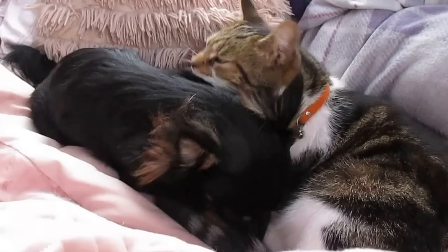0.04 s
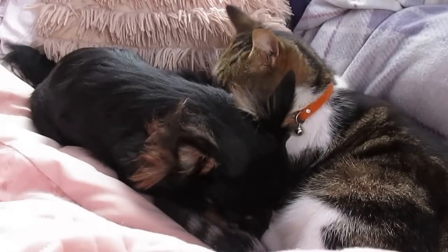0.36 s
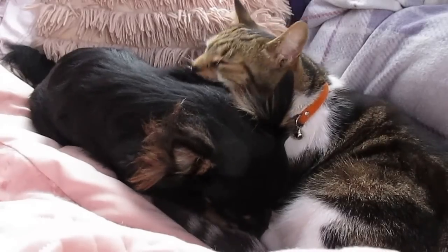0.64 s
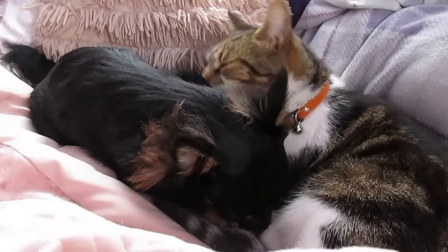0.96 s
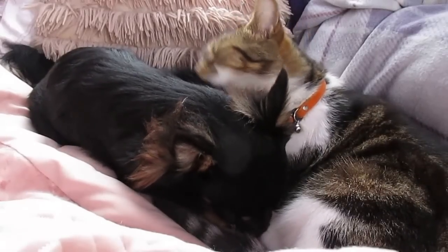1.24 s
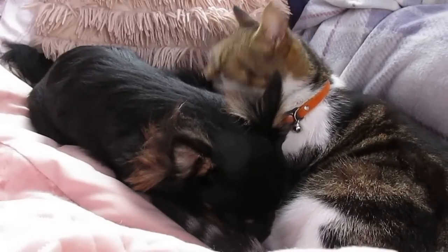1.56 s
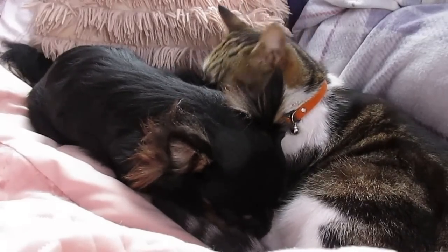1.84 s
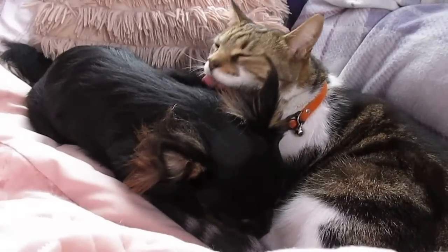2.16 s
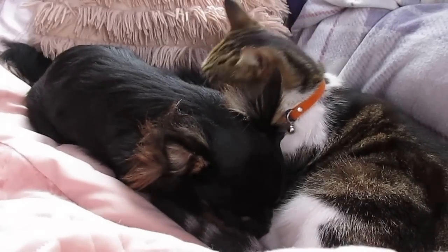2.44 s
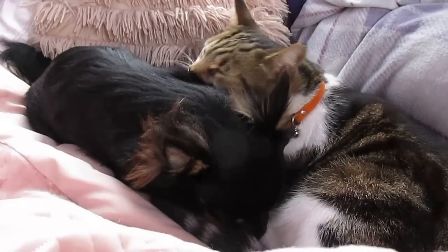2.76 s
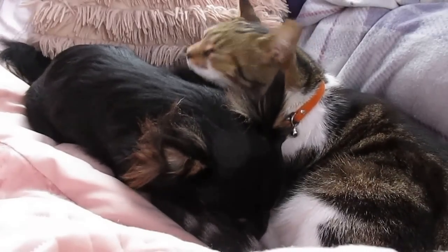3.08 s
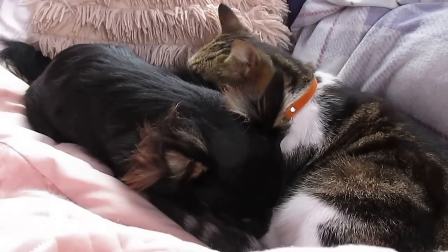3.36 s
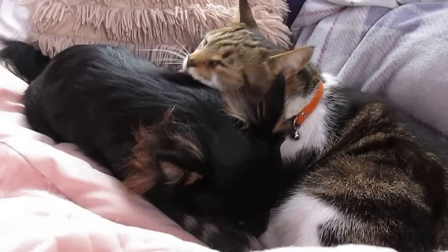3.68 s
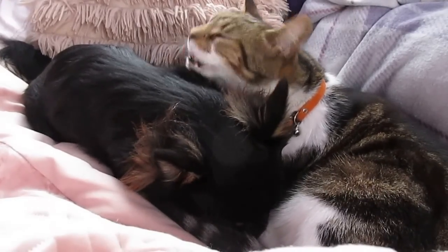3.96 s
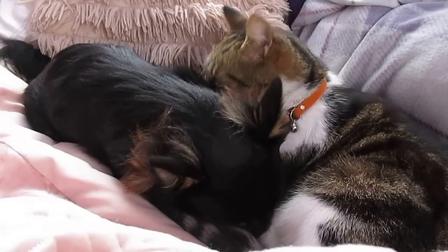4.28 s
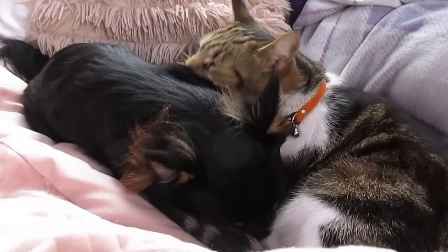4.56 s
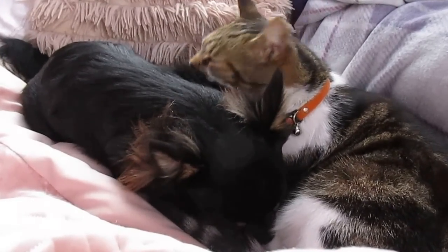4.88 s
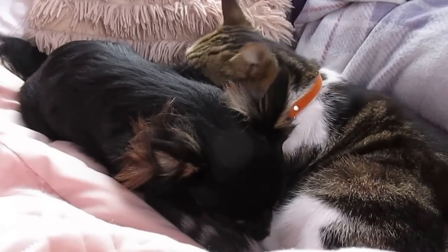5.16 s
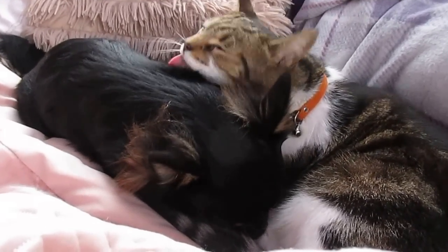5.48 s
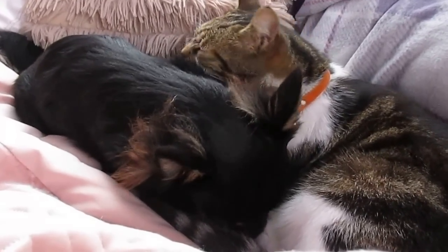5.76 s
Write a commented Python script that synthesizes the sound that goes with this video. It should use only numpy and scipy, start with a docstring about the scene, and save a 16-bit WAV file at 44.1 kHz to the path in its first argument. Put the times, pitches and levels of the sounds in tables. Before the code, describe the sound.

A cat licks a dog with faint wet clicks and rasps, over low room hum and a distant engine fading away.

```python
"""A cat grooms a dog on soft bedding in a quiet room, about a metre from a phone.
Over steady room tone and a wavering hum, a distant engine drones past behind the walls and fades.
The cat's tongue makes tiny wet clicks and rasps through the fur; a collar tinks faintly now and then.
Two muffled swells follow, then a soft, dull thump close to the microphone and one smack of the tongue.
Two more thumps come, the loudest on the left like handling of the phone, and a paw rubs the blanket."""
import sys
import numpy as np
from scipy import signal
from scipy.fft import rfft, irfft, next_fast_len
from scipy.io import wavfile

SR = 44100
rng = np.random.default_rng(int(sys.argv[2]) if len(sys.argv) > 2 else 0)


def wav_record(signal):
    """Record a signal, one row per channel, as 16-bit PCM in the file named by sys.argv[1]."""
    frames = np.transpose(np.atleast_2d(signal))
    bounded = np.clip(frames, -1, 1)
    # unit amplitude maps onto the largest positive 16-bit level
    quanta = np.round(bounded * 32767).astype(np.int16)
    wavfile.write(sys.argv[1], SR, quanta)


N = 265482
TIME = np.arange(N) / SR
TOP_HZ = 15800

# EQ of the room tone: (frequency [Hz], gain [dB])
ROOM_EQ = [(15, -10), (30, -9), (58, -2), (110, -9.5), (180, -10.5), (235, -19), (290, -19.5), (550, -29),
           (800, -26), (980, -28.5), (1150, -24.5), (1700, -34), (3000, -45.5), (6000, -57)]
# EQ of the microphone hiss: (frequency [Hz], gain [dB])
HISS_EQ = [(500, -6), (2400, 0.5), (3500, -1), (5000, -3.5), (7000, -3), (9200, -2), (12000, -5),
           (15500, -11)]
# weak tones of the engine and its driven parts: (multiple of the firing rate, level re firing tone [dB])
ENGINE_PARTIALS = [(.5, -17.5), (3, -17.5), (3.38, -22.5), (4.27, -26), (5, -32.5), (6, -29)]
# EQ of the engine's rumble: (frequency [Hz], gain [dB])
RUMBLE_EQ = [(15, -2), (32, 8), (60, 9.5), (90, -9), (125, 1), (162, 4), (200, -8), (243, -1), (275, -16),
             (390, -17), (520, -21), (740, -20.5), (950, -26), (1800, -41)]
# EQ of the engine's brighter noise as it approaches: (frequency [Hz], gain [dB])
APPROACH_EQ = [(180, -6), (240, 6), (330, 2), (480, -6), (720, -4), (1000, -14), (1900, -17), (3500, -32)]
# wet tongue clicks: (time [s], peak level [dB], pitch [Hz])
TONGUE_CLICKS = [(.2185, -48, 11200), (.2668, -50, 14000), (.792, -49, 2500), (.807, -42, 7640),
                 (.8072, -43, 14000), (1.1706, -42, 3600), (1.496, -45, 13000), (1.635, -44.5, 10900),
                 (1.786, -43, 3320), (2.1375, -50, 2900), (2.1676, -37.5, 9500), (2.1686, -36, 14200),
                 (2.9985, -47, 13000), (3.2405, -48.5, 7700), (3.709, -40, 10200), (3.7141, -48.5, 2840),
                 (3.805, -40.5, 9600), (3.905, -48.5, 2800), (4.6874, -40, 2500), (4.7444, -45, 8000),
                 (4.7446, -46, 14000), (4.979, -47, 10100)]
# tongue strokes through fur: (time [s], half length [s], level [dB], low-pass [Hz], mouth ring mix [dB])
LICK_STROKES = [(.767, 0.049, -69, 9000, -4), (1.723, .03, -66, 4500, -11), (1.845, .018, -63.5, 5000, 3),
                (2.714, 0.021, -58.5, 10000, -6.5), (2.927, .037, -69, 14000, -7),
                (3.767, .022, -62.5, 3600, -8), (4.718, .021, -56.5, 8900, -7),
                (4.99, 0.054, -68.5, 8000, -14), (5.713, 0.051, -66, 5000, -11)]
# EQ of the plucked hairs: (frequency [Hz], gain [dB])
RASP_EQ = [(600, 0), (1300, -6), (1850, 0.5), (2300, 1), (2750, -1), (3400, 4), (4500, 0.5), (5100, -0.5),
           (5900, 3.5), (7000, -1), (9600, 1.5), (12000, -3), (16000, -16)]
# resonances of the half-open mouth during a stroke: (frequency [Hz], width [Hz], gain [dB])
LICK_FORMANTS = [(2264, 82, 7), (3170, 97, -12), (4350, 170, -2.5)]
# whiskers and cheek brushing the coat: (time [s], half length [s], level [dB])
CHEEK_BRUSHES = [(.76, .062, -71), (2.97, .088, -72), (3.743, 0.18, -68.5), (5.448, .11, -68)]
# light touches of the collar's metal fittings: (time [s], peak level [dB], pitch [Hz])
COLLAR_TINKS = [(1.787, -59, 3300), (3.003, -57.5, 4980), (5.3775, -57, 4950)]
# muffled swells in the low mids: (time [s], half length [s], level [dB])
MUFFLED_SWELLS = [(2.273, 0.11, -66), (2.865, 0.048, -67)]
# soft, dull thumps close to the microphone: (time [s], level [dB], pitch [Hz], left minus right [dB])
CLOSE_THUMPS = [(4.6868, -53, 290, 4), (5.641, -50, 510, -1), (5.7222, -43, 246, 19)]
# EQ of the crunch in each thump: (frequency [Hz], gain [dB])
CRUNCH_EQ = [(150, -8), (330, 14), (650, -6), (1100, -9), (2400, -19), (4200, -14), (8000, -24),
             (15000, -31)]
# modes of the open mouth rung by a smack: (frequency [Hz], gain [dB], t60 [s])
SMACK_MODES = [(2000, 5, 0.0069), (2450, 4, 0.0078), (2800, -5.5, 0.014), (3380, -5, 0.0074),
               (3870, -3, 0.0079), (5650, -3.5, 0.005), (6100, -8, 0.0063), (7600, -3, .007),
               (8470, -3, 0.0055), (9800, -12, 0.0049), (12400, 9, 0.0028), (14800, 2, .0018)]
# EQ of a paw rubbing the blanket: (frequency [Hz], gain [dB])
RUB_EQ = [(150, 3.5), (380, -0.5), (470, 6), (560, -3.5), (900, -1.5), (1250, -21), (1500, -9), (1700, -17),
          (2100, -6.5), (2800, -14.5), (3200, -12), (4200, -27), (9000, -25), (15000, -39)]


def undb(db):
    """Decibels to gain."""
    return 10 ** (np.asarray(db) / 20)


def unit(x):
    """Scale to rms 1."""
    return x / np.sqrt(np.mean(x ** 2))


def pan(db):
    """Left and right gains for a level difference; positive leans left."""
    return undb(np.array([[db], [-db]]) / 2)


def butter(x, order, hz, kind="low"):
    """Run a sound through a Butterworth filter."""
    return signal.sosfilt(signal.butter(order, hz, kind, fs=SR, output="sos"), x)


def wander(rate_hz):
    """Smooth random modulation of rms 1, rolling off above the given rate."""
    hz = np.arange(N // 2 + 1) * SR / N
    return unit(irfft(rfft(rng.standard_normal(N)) * np.exp(-(hz / rate_hz) ** 2), N))


def noise(eq, correlation, below_hz=20000):
    """Stereo noise of rms 1 shaped by an EQ; left and right are partly correlated below a frequency."""
    size = next_fast_len(N, real=True)
    hz = np.maximum(np.arange(size // 2 + 1) * SR / size, 1)
    eq_hz, eq_db = np.array(eq).T
    low_cut = np.minimum(hz / eq_hz[0], 1)
    gain = undb(np.interp(np.log(hz), np.log(eq_hz), eq_db)) * low_cut
    likeness = correlation * np.exp(-(hz / below_hz) ** 4)
    mid, side = rfft(rng.standard_normal((2, size)))
    mid, side = mid * np.sqrt(1 + likeness), side * np.sqrt(1 - likeness)
    return unit(irfft(gain * np.array([mid + side, mid - side]), size)[:, :N])


def bell(s, half_s):
    """A bell-shaped envelope that peaks at time s and is at 61% half_s to either side."""
    return np.exp(-((TIME - s) / half_s) ** 2 / 2)


def push(s, attack_s):
    """An envelope that starts at time s, rises to 1 over the attack and dies away."""
    age = np.maximum(TIME - s, 0) / attack_s
    return age * np.exp(1 - age)


def ping(t, hz, t60):
    """One struck resonance: a sine that falls 60 dB in t60 seconds."""
    return np.sin(2 * np.pi * hz * t) * undb(-60 * t / t60)


def add(out, s, sound):
    """Mix a short stereo sound in at time s."""
    start = int(s * SR)
    out[:, start:start + sound.shape[1]] += sound[:, :N - start]


def scatter(ring, tail_db, t60):
    """A click scaled to peak 1, trailed on each side by weak reflections from things close by."""
    t = TIME[:len(ring)]
    paths = undb(tail_db) * rng.standard_normal((2, len(t))) * undb(-60 * t / t60)
    paths[:, 0] = 1  # direct sound
    return signal.fftconvolve(paths, ring[None] / np.abs(ring).max(), axes=1)


def room_tone(air_db=-50.5, hiss_db=-63.5):
    """A bed of low room noise, its mids leaning right, under smooth microphone hiss."""
    air = undb(air_db + 1.03 * wander(1.2)) * noise(ROOM_EQ, correlation=.31, below_hz=107)
    mids = butter(air, 1, [450, 2200], "band")
    hiss = undb(hiss_db) * pan(.4) * noise(HISS_EQ, correlation=.065)
    return air - mids + pan(-3.5) * mids + hiss


def pass_by(fall_s, nearest_s=.59):
    """One-over-distance gain of a source passing in a line: 1 when nearest, 3 dB down fall_s later."""
    return 1 / np.hypot(1, (TIME - nearest_s) / fall_s)


def engine(firing_hz=71.32, climb_hz_per_s=.3, tone_db=-40, rumble_db=-44, approach_db=-56):
    """A far engine goes by, brighter as it comes; walls pass mainly its low firing tones and rumble."""
    rate_hz = (firing_hz + climb_hz_per_s * TIME) * (1 + .002 * wander(7.07))
    phase = 2 * np.pi * np.cumsum(rate_hz) / SR
    dip_db = -17.5 * bell(.327, .11)  # the octave drops out once on the approach
    tones = undb(tone_db) * np.sin(phase) + undb(tone_db + dip_db) * np.sin(2 * phase)
    for order, db in ENGINE_PARTIALS:
        gain = undb(tone_db + db + 2.4 * wander(3.1))
        tones += gain * np.sin(order * phase + 2 * np.pi * rng.random())
    rumble = undb(rumble_db) * noise(RUMBLE_EQ, correlation=.78, below_hz=460)
    approach = undb(approach_db) * noise(APPROACH_EQ, correlation=.3) * bell(.18, .3)
    return np.sqrt(2) * tones * pass_by(fall_s=.49) + rumble * pass_by(fall_s=1.32) + approach


def hum(hz=149.64, pitch_waver=.01229, start_db=-55, growth_db_per_s=.8, waver_db=2.2):
    """An unsteady, slowly growing hum that beats against the engine's octave."""
    phase = 2 * np.pi * np.cumsum(hz * (1 + pitch_waver * wander(9.08))) / SR
    lull_db = -5.5 * bell(3.85, .45)
    db = start_db + growth_db_per_s * TIME + lull_db + waver_db * wander(4.6)
    return np.sqrt(2) * undb(db) * np.sin(phase)


def tongue_clicks(base_hz=2000, base_width_hz=1050, left_db_per_octave=2.5):
    """Each saliva film that snaps gives a few cycles of one damped resonance; the high ones lean left."""
    out, t = np.zeros((2, N)), TIME[:SR // 40]
    attack = 1 - np.exp(-t / .0001)
    for s, db, hz in TONGUE_CLICKS:
        width_hz = base_width_hz * np.sqrt(hz / base_hz)
        ring = np.sin(2 * np.pi * hz * t) * np.exp(-np.pi * width_hz * t) * attack
        pan_db = left_db_per_octave * np.log2(hz / base_hz)
        add(out, s, undb(db) * pan(pan_db) * scatter(ring, tail_db=-14.5, t60=.0076))
    return out


def licks(pan_db=2.5):
    """Tongue barbs pluck hairs in a grainy rasp that rings the mouth; the cheek brushes softly along."""
    hairs = unit(noise(RASP_EQ, correlation=.085) * undb(3.5 * wander(470)))
    mouth = unit(sum(undb(db) * signal.lfilter(*signal.iirpeak(hz, hz / width_hz, fs=SR), hairs)
                     for hz, width_hz, db in LICK_FORMANTS))
    rasps = np.zeros((2, N))
    for s, half_s, db, lowpass_hz, ring_db in LICK_STROKES:
        stroke = unit(butter(hairs, 2, lowpass_hz))
        rasps += undb(db) * bell(s, half_s) * (stroke + undb(ring_db) * mouth)
    coat = noise([(2500, -16), (6000, .5), (11000, 3), (16000, -8)], correlation=.26)
    grain = undb(2.7 * wander(810))
    brushes = coat * grain * sum(undb(db) * bell(s, half_s) for s, half_s, db in CHEEK_BRUSHES)
    return pan(pan_db) * (rasps + brushes)


def collar(t60=.055, pan_db=1.2):
    """Small pieces of metal on the collar ring faintly as the head moves."""
    out, t = np.zeros((2, N)), TIME[:SR // 8]
    for s, db, hz in COLLAR_TINKS:
        add(out, s, undb(db) * pan(pan_db) * ping(t, hz, t60))
    return out


def muffled_swells():
    """A muffled rush rises and sinks twice."""
    rush = noise([(260, -10), (355, 3), (480, -3), (700, -26), (1100, -22), (2000, -35)], correlation=.43)
    return rush * sum(undb(db) * bell(s, half_s) for s, half_s, db in MUFFLED_SWELLS)


def close_thumps(thud_attack_s=.001028, crunch_attack_s=.0013, crunch_db=-5.5):
    """Short, dull thuds layered with a crunch; the loudest is on the left, like handling of the phone."""
    out, grit = np.zeros((2, N)), noise(CRUNCH_EQ, correlation=.48)
    for s, db, hz, pan_db in CLOSE_THUMPS:
        thud = -np.sin(2 * np.pi * hz * (TIME - s)) * push(s, thud_attack_s)
        crunch = undb(crunch_db) * grit * push(s, crunch_attack_s)
        out += undb(db) * pan(pan_db) * (thud + crunch)
    return out


def tongue_smack(s=5.5776, db=-27.5, pan_db=-7.5, left_lag_s=.000282, low_cut_hz=1600):
    """The tongue peels from the palate and rings the whole mouth; the sound reaches the right first."""
    out, t = np.zeros((2, N)), TIME[:SR // 40]
    attack = 1 - np.exp(-t / .0002)
    ring = attack * sum(undb(mode_db) * ping(t, hz, t60) for hz, mode_db, t60 in SMACK_MODES)
    ring = butter(ring, 3, low_cut_hz, "high")  # so small a mouth radiates no bass
    left, right = scatter(ring, tail_db=-22, t60=.007)[:, :len(t)]
    left = np.interp(t - left_lag_s, t, left, left=0)
    add(out, s, undb(db) * pan(pan_db) * np.array([left, right]))
    return out


def paw_rub(s=5.86, attack_s=.028, db=-50.5, pan_db=-9.5):
    """A paw slides on the blanket: one short, grainy rub of cloth on the right."""
    friction = noise(RUB_EQ, correlation=.17) * undb(db + wander(150))
    return pan(pan_db) * friction * push(s, attack_s)


def scene():
    """The room and the engine as a backdrop, the two animals close up."""
    backdrop = room_tone() + engine() + hum()
    grooming = tongue_clicks() + licks() + collar()
    return backdrop + grooming + muffled_swells() + close_thumps() + tongue_smack() + paw_rub()


def record(dry):
    """The phone cuts the top with a steep low-pass."""
    return signal.sosfilt(signal.ellip(10, .1, 70, TOP_HZ, fs=SR, output="sos"), dry)


dry = scene()
out = record(dry)
wav_record(out)
```